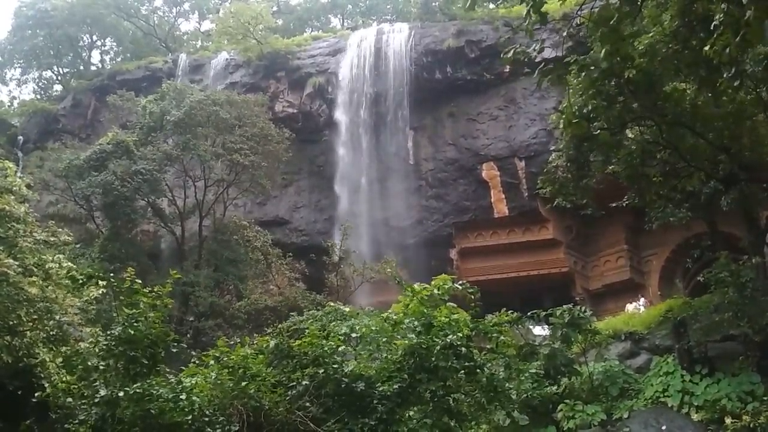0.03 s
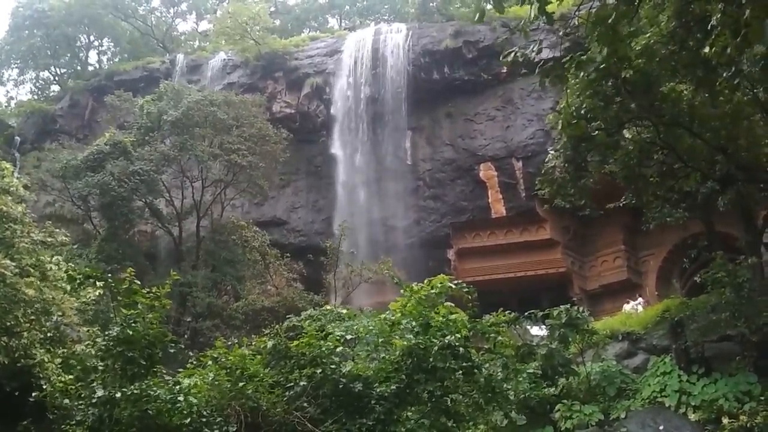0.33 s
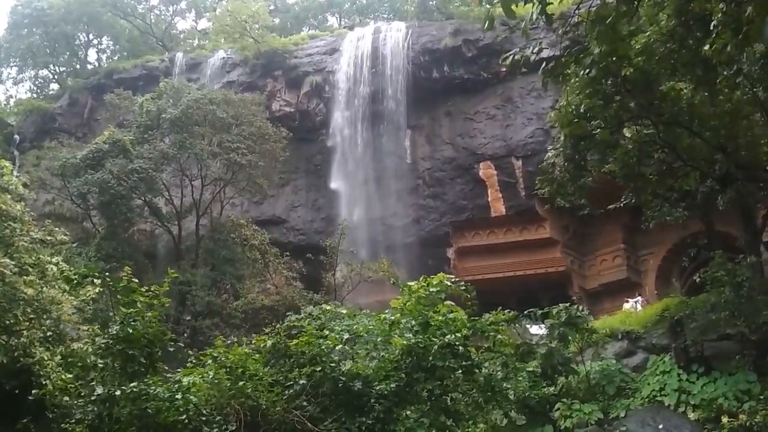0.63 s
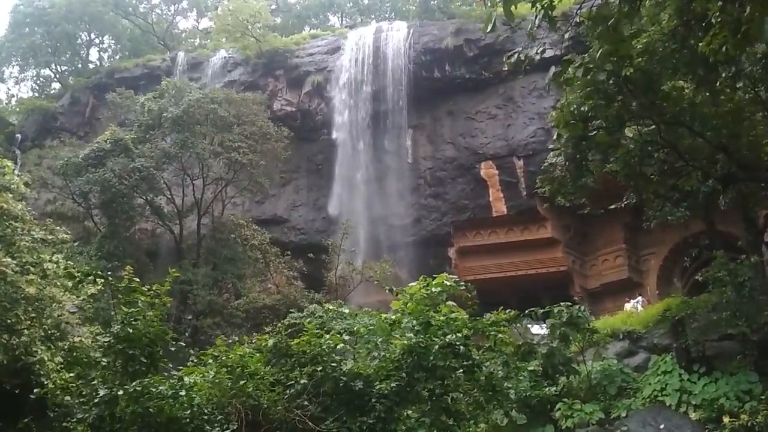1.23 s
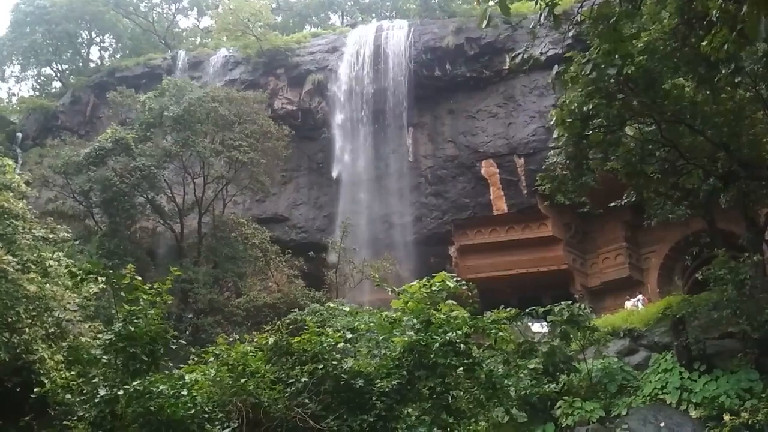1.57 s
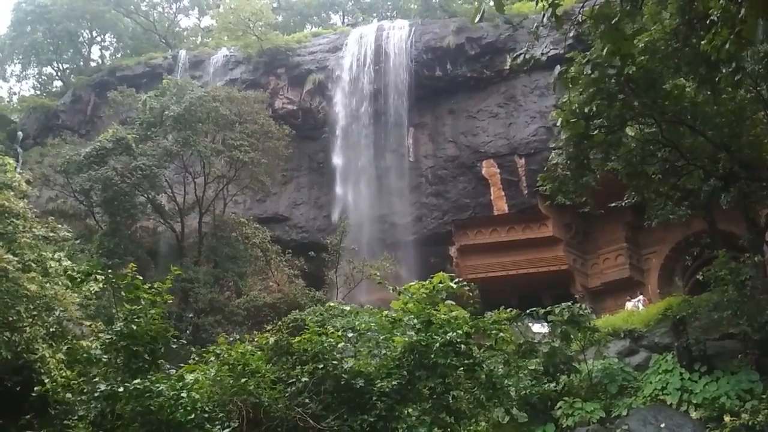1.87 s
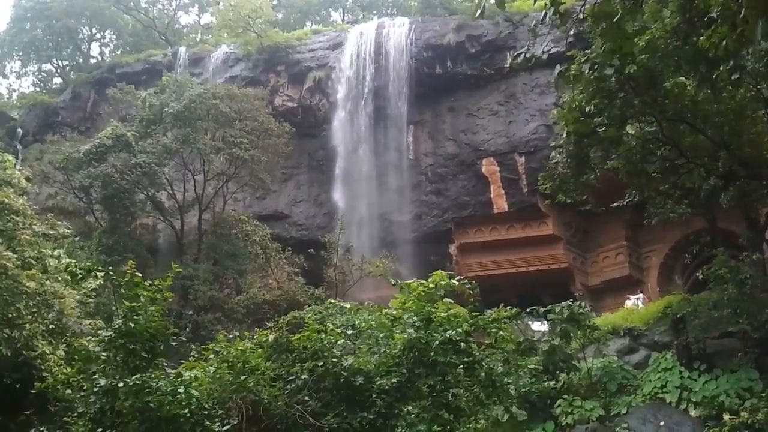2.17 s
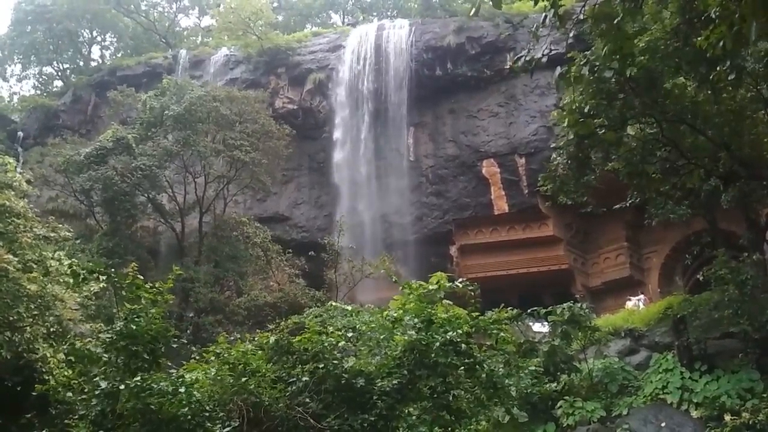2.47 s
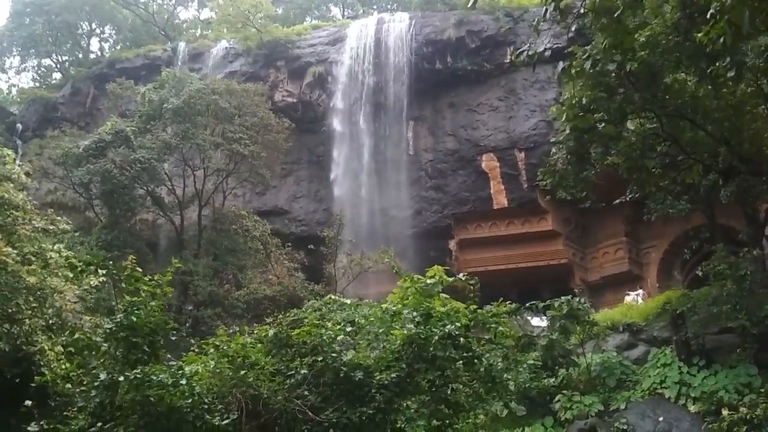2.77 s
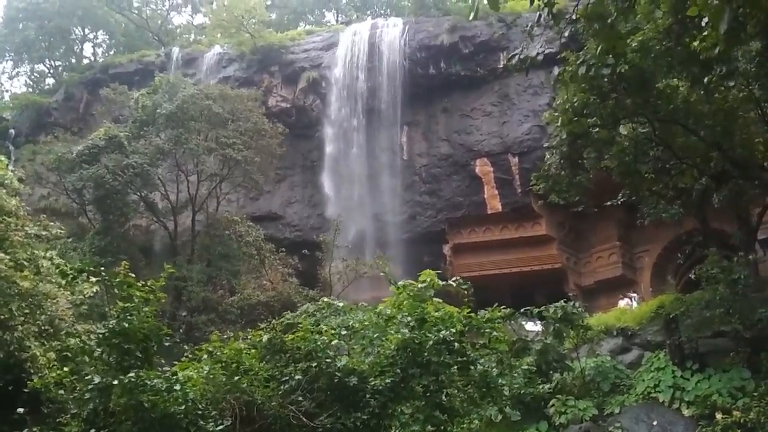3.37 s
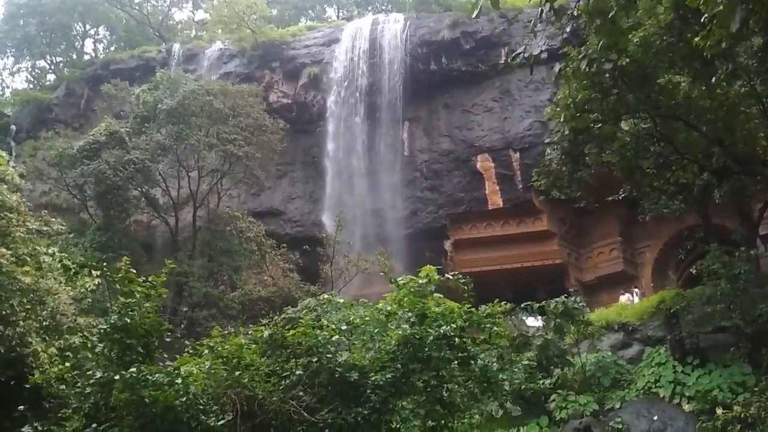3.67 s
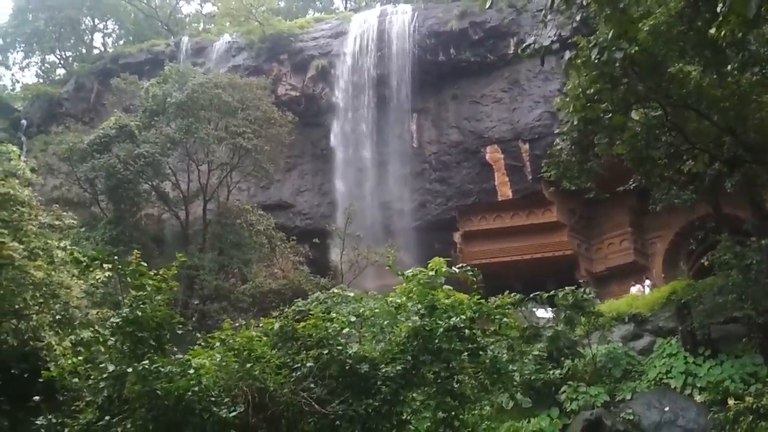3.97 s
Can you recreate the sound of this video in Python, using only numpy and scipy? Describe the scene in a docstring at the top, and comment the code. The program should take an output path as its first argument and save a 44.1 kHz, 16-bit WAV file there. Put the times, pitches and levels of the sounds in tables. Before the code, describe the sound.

A waterfall rushes off a rock face among trees, its spray hissing. The hand-held microphone is half covered, adding low rumble and soft bumps, then stuttering finger rubs and one dull thump at the end.

```python
"""Waterfall, one microphone covered.

A tall waterfall roars steadily off a rock face, heard from among trees on a hand-held camera.
The open right microphone gets the roar, a bright hiss of spray and soft handling bumps.
A finger covers the left: dull water and a low rumble, then stuttering slips and one final thump."""
import sys
import numpy as np
from scipy import signal
from scipy.fft import rfft, irfft, next_fast_len
from scipy.io import wavfile
from scipy.ndimage import uniform_filter1d

SR = 44100
rng = np.random.default_rng(int(sys.argv[2]) if len(sys.argv) > 2 else 0)


def wav_record(signal):
    """Record a signal, one row per channel, as 16-bit PCM in the file named by sys.argv[1]."""
    frames = np.transpose(np.atleast_2d(signal))
    bounded = np.clip(frames, -1, 1)
    # unit amplitude maps onto the largest positive 16-bit level
    quanta = np.round(bounded * 32767).astype(np.int16)
    wavfile.write(sys.argv[1], SR, quanta)


N = 176400

# Water at the open microphone: freq_hz, density_db_per_hz
ROAR_SPECTRUM = [(20, -68), (45, -89), (85, -63), (130, -66), (260, -65), (480, -69.5), (720, -68),
                 (1200, -72.5), (1600, -72.5), (2800, -77), (4200, -78), (7000, -77.5), (16000, -81)]
SPRAY_SPECTRUM = [(2500, -100), (5500, -87.5), (7300, -77.5), (9000, -72.5), (10200, -67.5), (11150, -66),
                  (12100, -70.1), (13800, -74), (16000, -81.5)]
# Water at the covered microphone: freq_hz, density_db_per_hz
MUFFLED_SPECTRUM = [(20, -84), (100, -68), (260, -78.5), (350, -76.5), (500, -86), (750, -85), (1100, -90),
                    (2000, -94.5), (3300, -92.5), (4400, -100), (6500, -102), (9000, -109), (12000, -113),
                    (15000, -125)]
# Likeness of the roar at the two microphones: freq_hz, coherence
MIC_COHERENCE = [(40, 1), (150, 0.95), (280, 0.96), (520, 0.94), (750, 0.43), (1300, 0.46), (2500, 0),
                 (5000, 0.3)]
# Flicker of the rush: freq_hz, depth_db
FLICKER_DEPTH = [(700, 0.72), (2500, 1.67), (5500, 2.5), (9000, 0.86)]
# Finger rumble, deep part and part near the port resonance: freq_hz, density_db_per_hz
DEEP_RUMBLE_SPECTRUM = [(10, -66), (30, -58.5), (52, -54), (75, -60), (120, -82), (400, -120)]
PORT_RUMBLE_SPECTRUM = [(10, -83), (45, -64), (70, -61), (92, -57), (130, -64.5), (180, -71), (260, -88),
                        (500, -100), (1500, -130)]
# Levels of the two rumble parts: time_s, deep_gain_db, port_gain_db
RUMBLE_GAINS = [(0, 0, 2.5), (.4, -1.5, -3.5), (.7, -5, 1.5), (1.0, -2, 2.5), (1.4, -5, -2), (1.6, -6, 1.5),
                (2.0, 3.5, -3.5), (2.3, -4.5, -4), (2.65, 0, 1.5), (3.2, 0, 3), (3.35, 0, 0), (3.8, -1, 2),
                (4, 3, -4)]
# Single finger slips: start_s, peak_db
SINGLE_SLIPS = [(2.787, -25), (2.982, -24), (2.997, -22.5), (3.539, -23), (3.564, -20), (3.661, -17),
                (3.685, -17.5), (3.753, -21.5), (3.772, -20.5), (3.786, -18), (3.806, -20.5)]
# Runs of slips: start_s, length_s, mid_run_peak_db, start_rate_hz, glide_hz_per_s
SLIP_RUNS = [(1.557, .028, -24.5, 100, 0), (2.861, 0.025, -28, 92, 0), (3.019, 0.13, -19, 102, -100),
             (3.137, .11, -18.5, 120, -380), (3.861, .069, -18, 89, -100)]
# Finger jolts: start_s, peak_db, soft_hz, top_hz
FINGER_JOLTS = [(3.29, -25, 7000, 14000), (3.95, -40, 6000, 9000), (3.955, -2.5, 430, 1400)]
# Bumps at the open microphone: start_s, peak_db
HANDLING_BUMPS = [(.335, -29), (1.69, -34), (2.208, -28), (2.379, -28), (2.588, -31), (2.93, -28),
                  (3.468, -30)]


def waterfall(lag_rad=.7, delay_s=.00038):
    """The roar reaches both microphones, dull and late at the covered one; spray only the open one."""
    hz = np.fft.rfftfreq(N, 1 / SR)
    water = flickering_rush()
    coherence = np.clip(curve_at(MIC_COHERENCE, hz), 0, 1)
    lag = np.exp(-1j * (lag_rad + 2 * np.pi * hz * delay_s))
    shared = coherence * lag * rfft(water)
    separate = np.sqrt(1 - coherence ** 2) * rfft(flickering_rush())
    muffled = coloured(irfft(shared + separate, N), MUFFLED_SPECTRUM)
    roar = coloured(water, ROAR_SPECTRUM)
    spray = coloured(flickering_rush(), SPRAY_SPECTRUM) * wander(rate_hz=19, depth_db=0.27)
    return np.array([muffled, roar + spray]) * wander(rate_hz=1.0, depth_db=0.14)


def flickering_rush(patch_s=0.06, patch_hz=190):
    """Rushing noise whose treble flickers."""
    frame, hop = 1024, 256
    spectra = signal.stft(white(), nperseg=frame, noverlap=frame - hop)[2]
    patches = rng.standard_normal(spectra.shape)
    patches = uniform_filter1d(patches, round(patch_hz * frame / SR), axis=0)
    patches = uniform_filter1d(patches, round(patch_s * SR / hop), axis=1)
    depth_db = curve_at(FLICKER_DEPTH, np.fft.rfftfreq(frame, 1 / SR))
    gain = amp(depth_db[:, None] * unit_rms(patches))
    gain /= np.sqrt(np.mean(gain ** 2, axis=1, keepdims=True))
    return signal.istft(spectra * gain, nperseg=frame, noverlap=frame - hop)[1][:N]


def finger_rumble():
    """A finger resting on the port rumbles in two bands of shifting level."""
    t = np.arange(N) / SR
    time_s, deep_db, port_db = np.transpose(RUMBLE_GAINS)
    deep = coloured(white(), DEEP_RUMBLE_SPECTRUM) * amp(np.interp(t, time_s, deep_db))
    port = coloured(white(), PORT_RUMBLE_SPECTRUM) * amp(np.interp(t, time_s, port_db))
    return deep + port


def finger_slips(jitter_cycles=.12, spread_db=1.2, arch_db=4):
    """Each slip knocks softly, singly or in short runs that swell and fade; longer runs slow down."""
    t = np.arange(N) / SR
    slips = list(SINGLE_SLIPS)
    for start_s, length_s, peak_db, rate_hz, glide_hz_per_s in SLIP_RUNS:
        lateness, strength = rng.standard_normal(size=(2, 32))
        cycles = np.cumsum(np.maximum(rate_hz + glide_hz_per_s * t, 1)) / SR
        offset_s = np.interp(np.arange(len(lateness)) + jitter_cycles * lateness, cycles, t)
        level_db = peak_db + spread_db * strength - arch_db * (2 * offset_s / length_s - 1) ** 2
        slips += [(start_s + s, db) for s, db in zip(offset_s, level_db) if s < length_s]
    return port_pulses(slips, port_hz=115, port_q=1.86, soft_hz=117, top_hz=460)


def finger_jolts():
    """Sharp jolts of the finger: thin ticks and a thump."""
    return sum(port_pulses([(start_s, peak_db)], port_hz=104, port_q=1, soft_hz=soft_hz, top_hz=top_hz)
               for start_s, peak_db, soft_hz, top_hz in FINGER_JOLTS)


def handling_bumps():
    """Handling pushes softly on the open microphone."""
    return port_pulses(HANDLING_BUMPS, port_hz=71, port_q=0.68, soft_hz=200, top_hz=200)


def port_pulses(events, port_hz, port_q, soft_hz, top_hz, leak_hz=63.6):
    """Soft pressure steps (start_s, peak_db) leak away and swing once or twice in a microphone port."""
    size = next_fast_len(N + SR)
    hz, impulses = np.fft.rfftfreq(size, 1 / SR), np.zeros(size)
    for start_s, peak_db in events:
        impulses[round(start_s * SR)] -= amp(peak_db)
    u = 1j * hz / port_hz
    resonance = u * u / (u * u + u / port_q + 1)
    leak = 1 / (1 + 1j * hz / leak_hz)
    lowpass = 1 / (1 + (hz / soft_hz) ** 2) / np.sqrt(1 + (hz / top_hz) ** 8)
    response = resonance * leak * lowpass
    return irfft(rfft(impulses) * response, size)[:N] / abs(irfft(response, size)).max()


def wander(rate_hz, depth_db):
    """Random gain drifting below rate_hz, depth_db rms."""
    hz = np.fft.rfftfreq(N, 1 / SR)
    drift = irfft(rfft(white()) * (hz > 0) / (1 + (hz / rate_hz) ** 4), N)
    return amp(depth_db * unit_rms(drift))


def coloured(x, spectrum):
    """Filter by a table of freq_hz, gain_db."""
    return irfft(rfft(x) * amp(curve_at(spectrum, np.fft.rfftfreq(N, 1 / SR))), N)


def curve_at(table, hz):
    """Interpolate on a log-frequency axis."""
    freq_hz, value = np.transpose(table)
    return np.interp(np.log(hz + 1), np.log(freq_hz + 1), value)


def white():
    """Noise at 0 dB per Hz."""
    return rng.standard_normal(N) * np.sqrt(SR / 2)


def unit_rms(x):
    return x / np.sqrt(np.mean(x ** 2) + 1e-20)


def amp(db):
    return 10 ** (np.asarray(db) / 20)


def scene():
    """Water in both channels, finger left, bumps right."""
    water = waterfall()
    finger = finger_rumble() + finger_slips() + finger_jolts()
    return water + np.array([finger, handling_bumps()])


def record(dry):
    """Camera band limit."""
    cutoff_hz = 15850
    taps = signal.firwin(1023, cutoff_hz, window=("kaiser", 9), fs=SR)
    return signal.oaconvolve(dry, taps[None], "same", axes=1)


dry = scene()
out = record(dry)
wav_record(out)
```